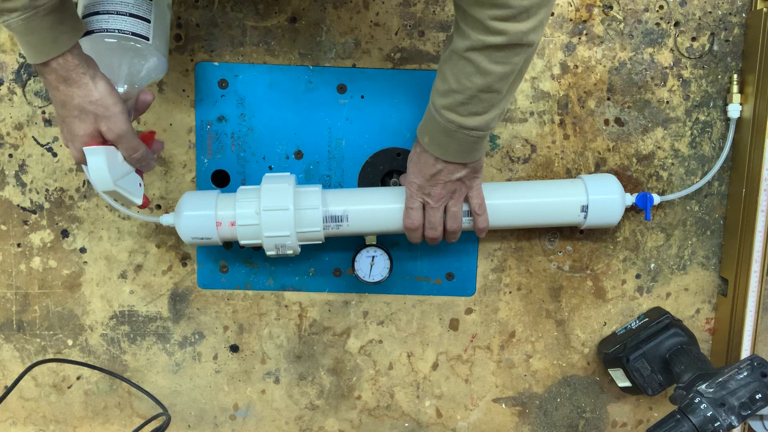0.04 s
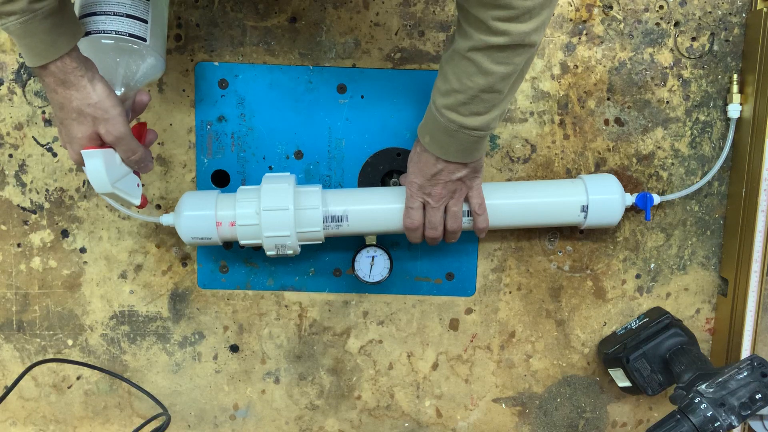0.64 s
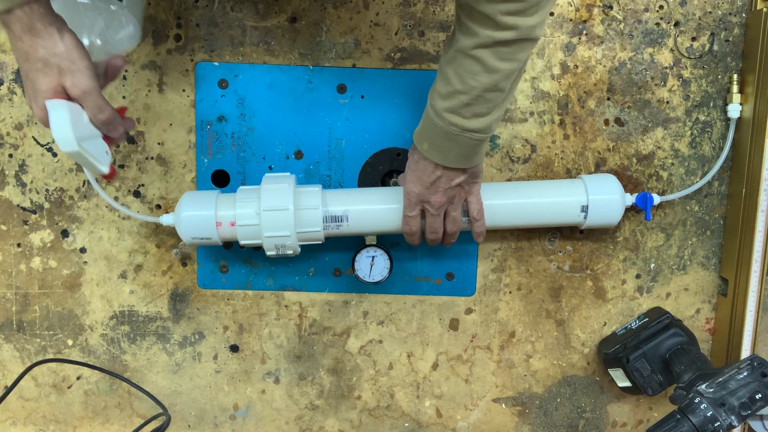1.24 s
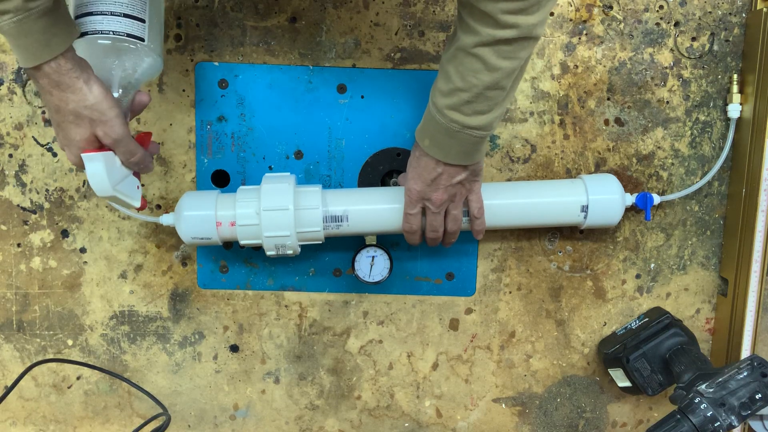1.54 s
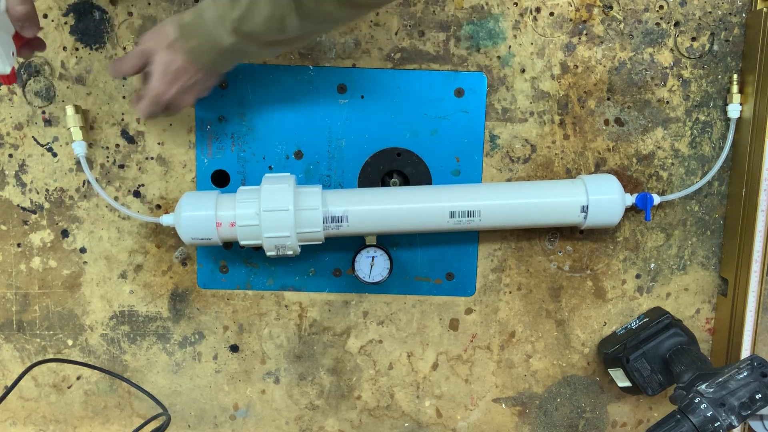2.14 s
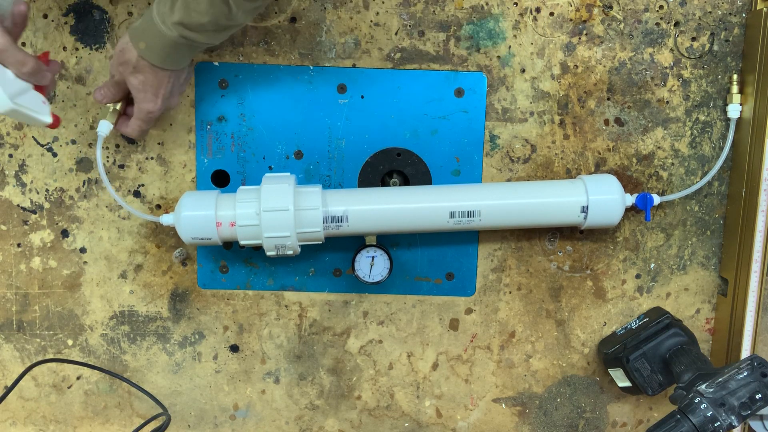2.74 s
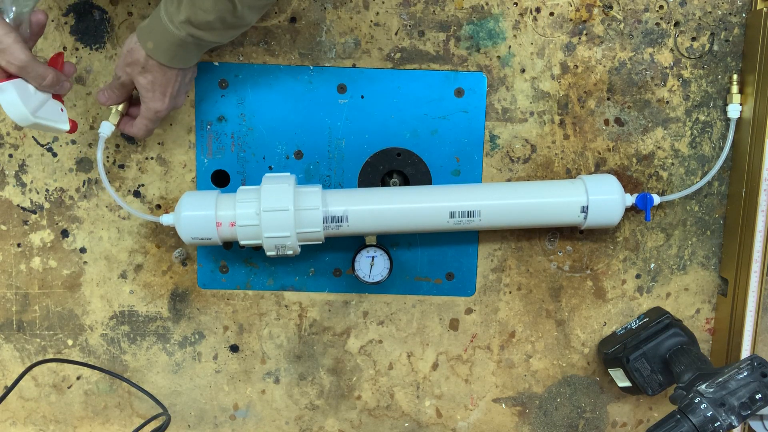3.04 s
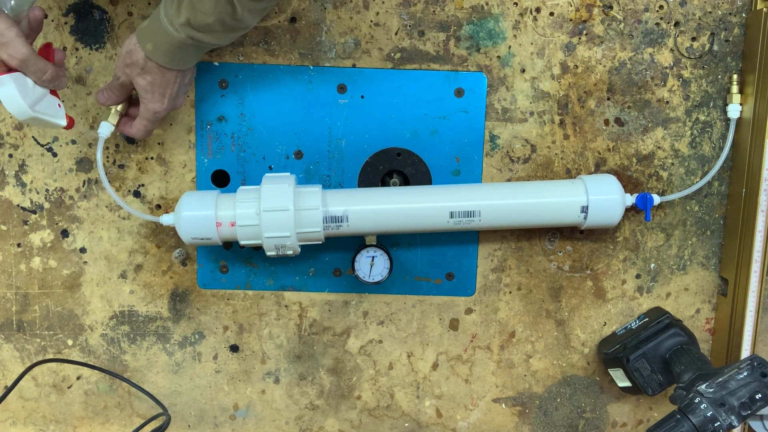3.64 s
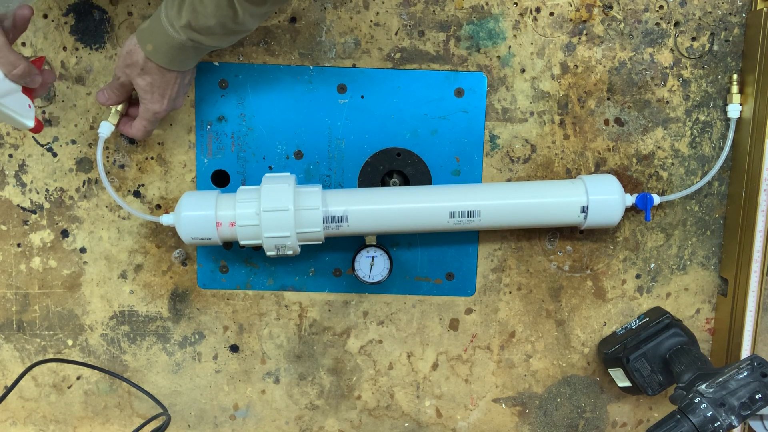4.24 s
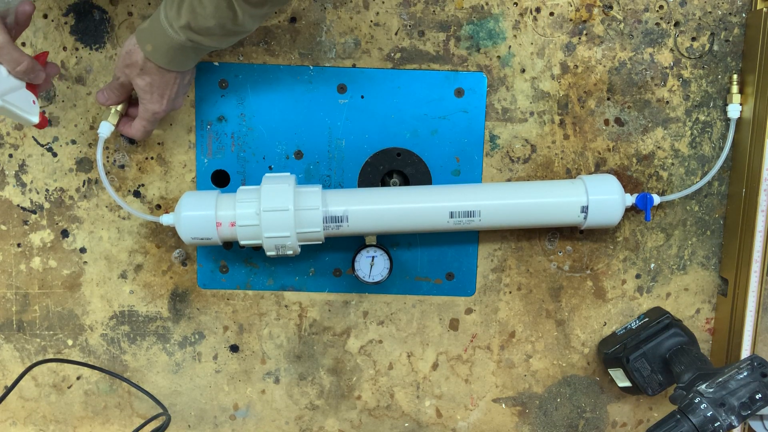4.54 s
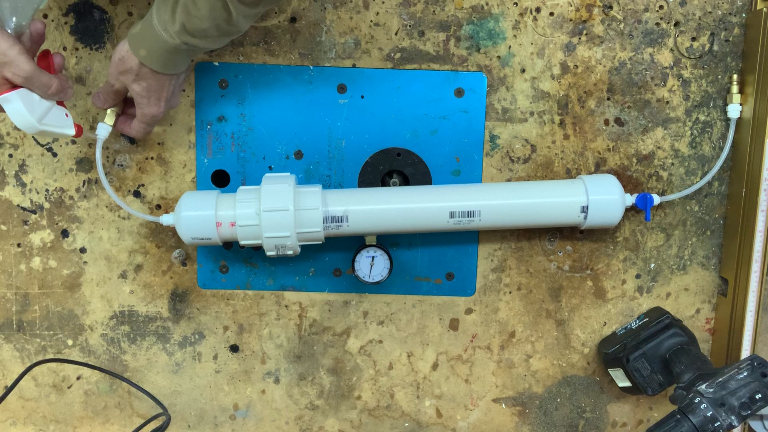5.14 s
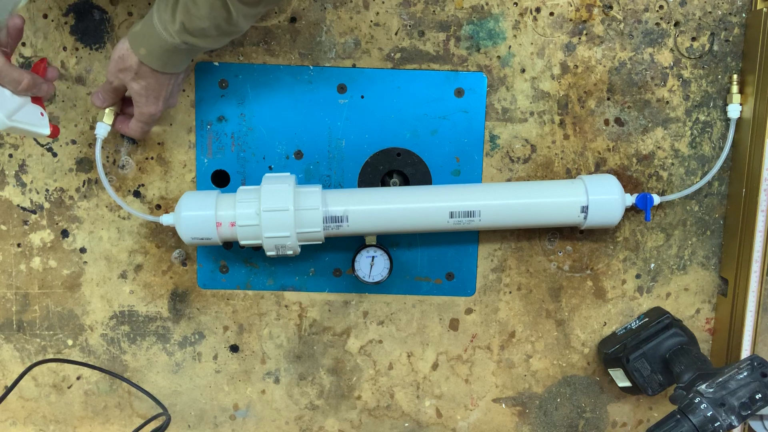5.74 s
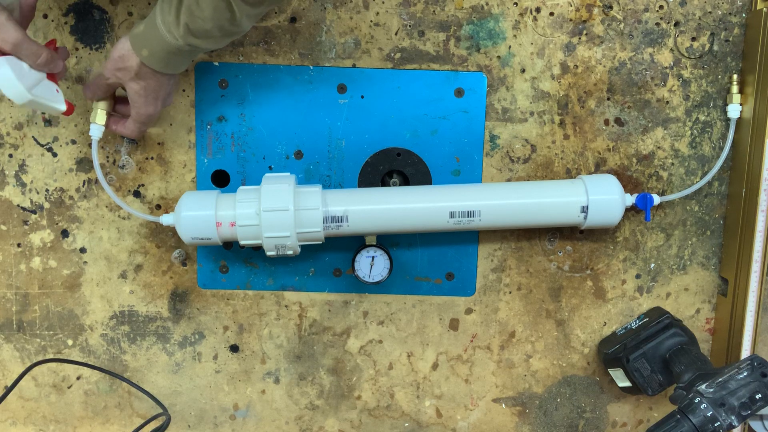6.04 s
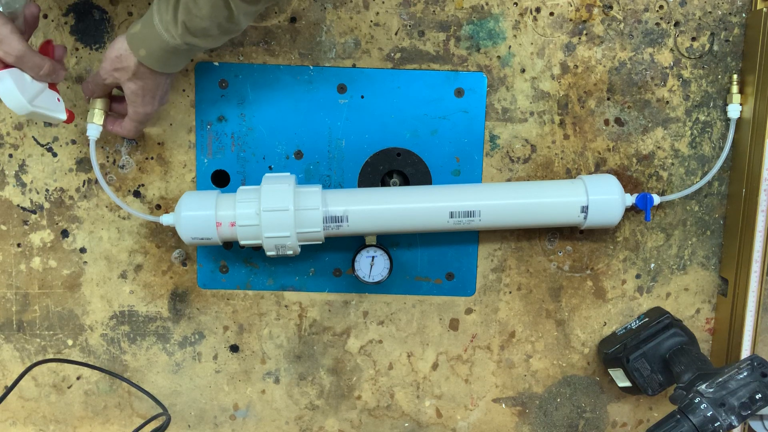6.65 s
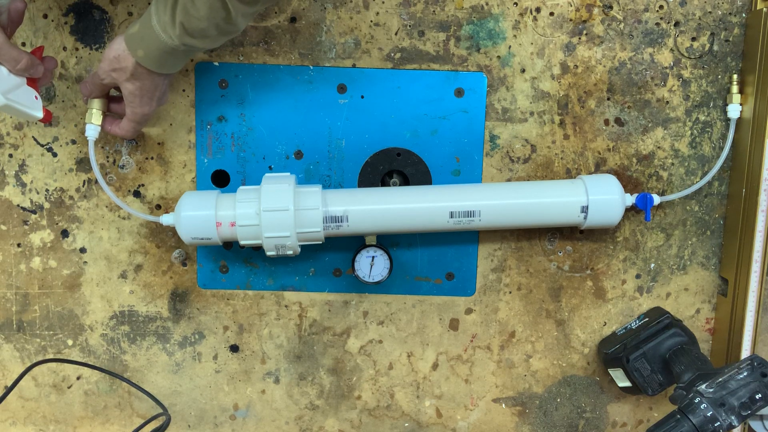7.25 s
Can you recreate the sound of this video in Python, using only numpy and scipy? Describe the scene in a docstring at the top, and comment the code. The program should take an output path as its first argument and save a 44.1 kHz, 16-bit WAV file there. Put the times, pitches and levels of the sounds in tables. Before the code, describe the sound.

A plastic trigger spray bottle squirts soapy water onto a brass fitting, close and slightly to the left. Each pull makes a quick, creaky spring snap, a short hiss and a small tick as the trigger returns. Three quick squirts come in the first 0.8 seconds, followed by release ticks and faint suction, then a weaker squirt near 1.7 seconds. From 2 to 2.7 seconds a sleeve rustles, fingers scuff a hose and hands softly bump the workbench. Four more squirts run from about 3.2 to 4 seconds, followed by ticks and a brief rub. Two softer, creakier pulls come at 5 and 5.4 seconds, and a fingertip faintly wipes the wet fitting near 5.8. Three light squirts follow between 6.3 and 6.9 seconds, ending in trigger ticks. A low ventilation drone continues throughout in the small, slightly echoing workshop.

```python
"""Quick clicks and short hisses: a spray bottle squirts soapy water on a brass fitting, off to the left.
At each pull the coils of the trigger spring snap free, the nozzle hisses and the valve shuts with a gulp.
The trigger ticks back, and when it is let out all the way the pump sucks up more water.
A sleeve rustles and hands bump the workbench, over the low drone of a small workshop's ventilation."""
import sys
import numpy as np
from scipy import signal
from scipy.fft import rfft, irfft, next_fast_len
from scipy.io import wavfile
from scipy.ndimage import map_coordinates

SR = 44100
rng = np.random.default_rng(int(sys.argv[2]) if len(sys.argv) > 2 else 0)


def store_wav(level_fs):
    """Save 16-bit WAV to argv[1]."""
    pcm = np.round(np.clip(np.atleast_2d(level_fs), -1, 1) * 32767)
    wavfile.write(sys.argv[1], SR, pcm.T.astype(np.int16))


N = 321224

# Levels in all tables are relative: each layer adds its own gain.
# pulls of the trigger: t/s, coils that slip, first gap/s, crack/dB, bottle shake/dB
PULLS = [(0.1272, 2, 0.0092, -19, -35.5), (0.391, 2, 0.0086, -20.5, -34.5), (0.646, 2, 0.0091, -22, -33),
         (1.666, 2, .0072, -21, -34.5), (3.184, 3, 0.0096, -24, -36.5), (3.4404, 2, 0.0091, -24, -35.5),
         (3.6847, 2, .009, -22, -37.5), (3.9113, 2, 0.0091, -20, -35.5), (5.011, 5, .016, -24.5, -34.5),
         (5.4097, 4, 0.015, -26.5, -36), (6.3297, 2, 0.009, -28.5, -40), (6.595, 2, .011, -23, -32),
         (6.8222, 3, 0.0079, -29, -39)]
# squirts: start/s, valve shuts/s, mist/dB, gulp/dB, tick/dB
SQUIRTS = [(0.0, 0, -51, -46, -38), (0.156, 0.266, -43, -41.5, -38.5), (0.413, 0.506, -40.5, -47.5, -33.5),
           (0.672, 0.736, -45, -45.5, -37.5), (1.457, 1.563, -60, -47.5, -40.5),
           (1.683, 1.744, -55.5, -45, -38.5), (2.932, 3.051, -56, -52.5, -39),
           (3.211, 3.305, -53, -50.5, -39.5), (3.403, 3.546, -44, -63, -39.5),
           (3.71, 3.791, -47, -51.5, -41.5), (3.935, 4.004, -45, -53, -41.5),
           (5.057, 5.231, -56, -58.5, -39), (5.452, 5.554, -54.5, -57.5, -40),
           (6.344, 6.462, -56, -53, -39.5), (6.61, 6.707, -55.5, -50.5, -41.5),
           (6.85, 6.905, -56, -47, -41), (7.251, 7.284, -61.5, -57, -52.5)]
# the trigger let out all the way: first tick/s, last tick/s, ticks, tick/dB, ring/dB, ping/dB, suction/dB
RELEASES = [(0.8766, 0.9727, 4, -36, -38.5, -40, -59), (1.8797, 1.934, 3, -32, -39.5, -31.5, -58.5),
            (4.1456, 4.211, 3, -32.5, -42, -49, -55.5), (5.335, 5.374, 2, -43.5, -51, -57, -61.5),
            (5.711, 5.7588, 2, -32.5, -47.5, -53, -67.5), (7.039, 7.0765, 2, -34, -43, -45, -70.5)]
# tone of a sharp click: f/Hz, level/dB
CLICK_TONE = [(200, 0), (1000, -7), (2400, -6), (3500, 2), (5500, 1.5), (7500, 1), (9000, 3.5),
              (11000, 2.5), (13500, -4.5), (16000, -34)]


def amp(db):
    """Turn decibels into a gain."""
    return 10 ** (np.asarray(db) / 20)


def unit(x):
    """Scale x to an average (rms) level of 1."""
    return x / np.sqrt(np.mean(x ** 2) + 1e-20)


def along(points, hz):
    """Read a table of (f/Hz, value) between its points, on a log frequency axis."""
    f, values = np.transpose(points)
    return np.interp(np.log(hz + 1), np.log(f + 1), values)


def filtered(x, response):
    """Change the strength and phase of each frequency in x by response(hz)."""
    n = x.shape[-1]
    padded = next_fast_len(n + 8192)
    return irfft(rfft(x, padded) * response(np.fft.rfftfreq(padded, 1 / SR)), padded)[..., :n]


def coloured(x, tone, size=2048):
    """Give x a tone (f/Hz, level/dB) with a filter that keeps white noise at the same power."""
    cepstrum = irfft(np.log(amp(along(tone, np.fft.rfftfreq(size, 1 / SR)))))
    cepstrum[1:size // 2] *= 2  # folded forward, so nothing rings before its cause
    cepstrum[size // 2 + 1:] = 0
    kernel = irfft(np.exp(rfft(cepstrum)))
    return signal.fftconvolve(x, kernel / np.linalg.norm(kernel))[:len(x)]


def ringing(modes, hz):
    """How an object with these resonances (f/Hz, width/Hz, level/dB) answers each frequency."""
    return sum((-1) ** k * amp(db) * 1j * hz * width / (centre ** 2 - hz ** 2 + 1j * hz * width)
               for k, (centre, width, db) in enumerate(modes))


def wobble(rate):
    """A smooth curve through rate random values a second."""
    return map_coordinates(rng.standard_normal(int(N * rate / SR) + 4), [np.arange(N) * rate / SR])


def swell(start, rise, hold, fall):
    """A loudness curve: it rises, stays full until hold seconds after the start, then dies away."""
    gain = np.zeros(N)
    first = min(max(round(start * SR), 0), N)
    age = np.arange(min(2 * SR, N - first)) / SR
    gain[first:first + len(age)] = np.minimum(age / rise, 1) * np.exp(-np.maximum(age - hold, 0) / fall)
    return gain


def bursts(times, levels_db, t60):
    """A burst of noise at each time, even across all pitches, fading about 60 dB in t60 seconds."""
    out, t = np.zeros(N + SR), np.arange(round(t60 * SR)) / SR
    fade = amp(-60 * t / t60)
    for at, db in zip(times, levels_db):
        spectrum = rfft(fade * rng.standard_normal(SR // 2)[:len(t)])
        burst = np.sqrt(fade) * irfft(spectrum / np.abs(spectrum), len(t))
        burst *= np.linalg.norm(fade) / np.linalg.norm(burst)
        out[max(round(at * SR), 0):][:len(t)] += amp(db) * burst
    return out[:N]


def grainy(tone, grain_db, grain_rate):
    """Noise at level 1 that comes in tiny clumps."""
    return unit(coloured(rng.standard_normal(N) * amp(grain_db * wobble(grain_rate)), tone))


def spread(pair, likeness):
    """Mix two unrelated signals into left and right: likeness 0 stays unrelated, 1 is the same."""
    angle = lambda hz: np.arccos(np.clip(along(likeness, hz), -1, 1)) / 2
    mid, side = filtered(pair, lambda hz: np.array([np.cos(angle(hz)), np.sin(angle(hz))]))
    return np.array([mid + side, mid - side])


def background():
    """A low ventilation drone, a little to the left, and a thin wash of air."""
    # tones of the drone and the air: f/Hz, level/dB
    drone_tone = [(20, -67), (30, -19), (42, 2.5), (55, -8), (66, 5.5), (76, 1), (92, -7), (108, -1.5),
                  (127, 2), (158, -14.5), (210, -15), (260, -15.5), (320, -13), (480, -27), (900, -54.5)]
    air_tone = [(150, -33), (300, -11), (420, -2), (560, -7.5), (800, -1.5), (1250, -0.5), (1600, -8.5),
                (2700, -22), (5000, -28.5), (8000, -31), (12000, -31), (16000, -42)]
    # how alike left and right are: f/Hz, likeness
    likeness = [(60, 0.96), (250, 0.55), (700, 0.103), (2000, 0.033), (12000, .1)]

    def wash(tone):
        noise = spread(rng.standard_normal((2, N)), likeness)
        return unit(filtered(noise, lambda hz: amp(along(tone, hz))))
    return amp([[-54], [-55.3]]) * wash(drone_tone) + amp(-64.5) * wash(air_tone)


def echoes(early_db, early_t60, late_db):
    """The room's answer to one click: the bench scatters it at once, the walls ring for longer."""
    # how long the walls echo: f/Hz, time to fade 60 dB/s
    fade_times = [(150, 0.5), (1000, 0.23), (4000, 0.28), (9000, 0.29), (16000, 0.078)]
    # tone of that echo: f/Hz, level/dB
    wall_tone = [(150, -3.5), (1000, -1.5), (4000, 2.5), (9000, 1), (16000, -2)]
    # how alike the left and right echoes are: f/Hz, likeness
    likeness = [(100, 0.78), (300, 0.53), (700, 0), (1500, 0.41), (12000, 0)]
    hz, t, noise = signal.stft(rng.standard_normal((2, SR // 2)), SR, nperseg=256)
    fade = amp(-60 * t / along(fade_times, hz)[:, None])
    late = signal.istft(noise * fade * amp(along(wall_tone, hz))[:, None], SR, nperseg=256)[1]
    age = np.arange(late.shape[1]) / SR
    early = rng.standard_normal(late.shape) * amp(-60 * age / early_t60)
    walls = amp(late_db) * late / np.linalg.norm(late[0])
    bench = amp(early_db) * early / np.linalg.norm(early[0])
    return np.pad(spread(walls + bench, likeness), ((0, 0), (round(0.002 * SR), 0)))


def workshop(x, block=16384):
    """The echoes change as the hands move: each block of sound gets a new random pattern."""
    out = np.zeros((2, N + 2 * SR))
    for start in range(0, N, block):
        pattern = echoes(early_db=-6, early_t60=0.026, late_db=-8)
        echoed = signal.fftconvolve(x[None, start:start + block], pattern, axes=1)
        out[:, start:start + echoed.shape[1]] += echoed
    return out[:, :N]


def from_the_left(x):
    """Sound reaches the left microphone first; the case around the pair shades each side a little."""
    # how far the left side is ahead: f/Hz, phase/rad
    lead = [(20, -0.5), (600, .5), (1900, 2), (3400, 4), (4700, 4), (5800, 4.5), (7500, 4), (9200, 4.5),
            (12600, 6.5), (15600, 9.5)]
    # how much louder the left side is: f/Hz, level/dB
    shade = [(200, -0.5), (700, 4.5), (1400, -2), (2500, -3), (4500, -2.5), (8500, 4.5), (14000, -1.5)]
    half = lambda hz: amp(along(shade, hz) / 2) * np.exp(0.5j * along(lead, hz))
    return filtered(x, lambda hz: np.array([half(hz), 1 / half(hz)]))


def rubbing():
    """Sleeve and fingers rub; the fibres' hiss grows more steeply with speed than the cloth's rustle."""
    # rubs: start/s, rise/s, fall/s, cloth/dB, fibre/dB
    rubs = [(2.005, 0.029, 0.9, -59, -68.5), (2.138, 0.057, 0.035, -50, -59.5),
            (2.43, 0.023, 0.087, -49, -51.5), (2.673, 0.0062, 0.03, -90, -74),
            (4.283, 0.0062, 0.04, -48.5, -48.5), (4.619, 0.0089, 0.081, -65, -72),
            (4.8, 0.013, 0.082, -66, -82), (5.773, 0.022, 0.08, -51.5, -56.5)]
    # tones of the rustle and the hiss: f/Hz, level/dB
    cloth_tone = [(120, -37.5), (200, -7), (232, -8.5), (414, -3.5), (500, -15.5), (628, -7), (954, -11.5),
                  (1610, -8), (5000, -17), (6500, -25.5), (11000, -120)]
    fibre_tone = [(2060, -23), (3500, -11.5), (6400, -4), (7600, -7.5), (8210, 0.5), (11700, -8),
                  (14700, -9), (16000, -28)]
    moves = [(swell(at, rise, rise, fall), cloth_db, fibre_db)
             for at, rise, fall, cloth_db, fibre_db in rubs]
    cloth_gain = sum(amp(db) * speed for speed, db, _ in moves)
    fibre_gain = sum(amp(db) * speed ** 1.9 for speed, _, db in moves)
    cloth = cloth_gain * grainy(cloth_tone, grain_db=2.5, grain_rate=250)
    fibre = fibre_gain * grainy(fibre_tone, grain_db=0.5, grain_rate=350)
    return amp(2) * cloth + amp(6) * fibre


def grips():
    """Fingers grip the fitting and the bottle with a short scuff."""
    # catches: t/s, level/dB
    catches = [(2.426, -43), (4.291, -45.5)]
    # tone of the scuff: f/Hz, level/dB
    scuff_tone = [(300, -31.5), (600, -12), (750, 11.5), (1150, 6), (1700, -5), (5000, -41)]
    return coloured(bursts(*np.transpose(catches), t60=0.099), scuff_tone)


def bench_bumps():
    """Hands and pipe bump the bench, which gives a deep thud and a higher knock."""
    # bumps: t/s, thud/dB, knock/dB
    bumps = [(0.594, -37.5, -42.5), (0.605, -39, -55), (1.441, -48, -53.5), (2.18, -53.5, -47),
             (2.343, -43.5, -49), (2.487, -38.5, -62), (2.518, -41.5, -57.5), (2.61, -45, -67)]
    # tones of the bench: f/Hz, level/dB
    thud_tone = [(30, -27), (70, 8.5), (130, 4.5), (180, 2.5), (260, -21), (400, -36), (2000, -57)]
    knock_tone = [(100, -24), (250, -3), (400, -5), (700, -19.5), (3000, -42)]
    times, thud_db, knock_db = np.transpose(bumps)
    thud = coloured(bursts(times, thud_db, t60=0.11), thud_tone)
    knock = coloured(bursts(times, knock_db, t60=0.1), knock_tone)
    return thud + amp(1) * knock


def fingertip():
    """A fingertip wipes the fitting once: wet skin judders over the brass."""
    # tone of skin on wet brass: f/Hz, level/dB
    brass_tone = [(200, -5.5), (400, -2), (700, -23), (1800, -19), (2700, -0.5), (3400, -22), (8000, -29)]
    wipe = swell(start=5.785, rise=0.0067, hold=0.038, fall=0.051)
    return amp(-47.5) * wipe * grainy(brass_tone, grain_db=-2, grain_rate=440)


def pump():
    """The valve shuts with a gulp; each full release sucks water up the tube, which rings faintly."""
    # tones of the valve, the sucking and the water standing in the tube: f/Hz, level/dB
    valve_tone = [(150, -30.5), (350, -2.5), (600, -4.5), (950, -3.5), (1400, -11.5), (2500, -23.5),
                  (8000, -50)]
    suction_tone = [(300, -12), (1200, -8), (1700, 0), (2200, -6), (3400, -6), (5000, -12), (10000, -14),
                    (16000, -22)]
    tube_tone = [(600, -45), (1450, -20), (1620, -3), (1690, 0), (1770, -3), (1980, -20), (5000, -50)]
    lead_s = 0.083  # water starts to move this long before the first tick
    _, shut, _, gulp_db, _ = np.transpose(SQUIRTS)
    gulps = coloured(bursts(shut, gulp_db, t60=0.019), valve_tone)
    refill = lambda fall: sum(amp(db) * swell(at - lead_s, rise=0.06, hold=0.19, fall=fall)
                              for at, *_, db in RELEASES)
    suction = refill(fall=0.022) * grainy(suction_tone, grain_db=3, grain_rate=440)
    ring = refill(fall=0.13) * unit(coloured(rng.standard_normal(N), tube_tone))
    return amp(6.5) * gulps + amp(-4) * suction + amp(-13) * ring


def trigger():
    """The plastic lever ticks after each squirt; a full release gives a ping and a fading run of ticks."""
    # loose ticks as the finger shifts: t/s, level/dB
    loose_ticks = [(0.1134, -38), (0.37, -45), (1.5847, -41), (3.887, -44), (5.252, -48), (6.8014, -39.5)]
    # tone of the short ring after a tick: f/Hz, level/dB
    ring_tone = [(300, -20), (1200, -7), (1900, 1), (2500, -3), (3300, -1), (4200, -2), (6000, -7),
                 (16000, -24)]
    # resonances of the lever when it hits its stop: f/Hz, width/Hz, level/dB
    lever_modes = [(1790, 160, -1), (2080, 130, -9), (3470, 150, 3.5), (3850, 62, 1)]
    rest_s, tick_loss_db, ring_loss_db = 0.056, 5, 4  # wait after the valve shuts; losses per tick in a run
    returns = [(shut + rest_s, db) for _, shut, _, _, db in SQUIRTS]
    singles = [(at, db, db - 9) for at, db in returns + loose_ticks]
    runs = [(at, db - k * tick_loss_db, ring_db - k * ring_loss_db)
            for first, last, count, db, ring_db, _, _ in RELEASES
            for k, at in enumerate(np.linspace(first, last, round(count)))]
    times, tick_db, ring_db = np.transpose(singles + runs)
    tick = coloured(bursts(times, tick_db + 0.5, t60=0.005), CLICK_TONE)
    ring = coloured(bursts(times, ring_db + 6, t60=0.0062), ring_tone)
    stops, *_, ping_db, _ = np.transpose(RELEASES)
    ping = filtered(bursts(stops, ping_db + 19.5, t60=0.0023), lambda hz: ringing(lever_modes, hz))
    return tick + ring + ping


def slip_db(gap):
    """A coil slips more softly after a longer gap: 7.5 dB less for each doubling."""
    usual_gap_s = 0.0088
    return -7.5 * np.log2(gap / usual_gap_s)


def coils():
    """Coils slip ever faster, and the faster the harder. Gives t/s, crack/dB, bottle shake/dB."""
    slips = []
    for at, count, first_gap, crack_db, shake_db in PULLS:
        k = np.arange(round(count))
        gaps = first_gap * 0.78 ** k
        last = k == k[-1]  # the last coil cracks less and shakes the bottle more
        slips.append([at + np.cumsum(gaps) - gaps,
                      crack_db + slip_db(gaps) - 7 * last,
                      shake_db + slip_db(gaps) + 0.5 * last])
    return np.hstack(slips)


def bottle(x, lag):
    """The spring carries low notes late (by lag seconds at 1 kHz) into the ringing bottle."""
    # resonances of the pump and bottle: f/Hz, width/Hz, level/dB
    bottle_modes = [(239, 33, -2.5), (292, 28.6, 3.5), (380, 97, -3), (495, 48, -7), (619, 31, -4),
                    (779, 55, -3.5), (944, 90, 2), (991, 110, -1.5), (1325, 130, -14.5)]
    delay = lambda hz: np.exp(-4j * np.pi * lag * np.sqrt(1000 * hz))
    return filtered(x, lambda hz: ringing(bottle_modes, hz) * delay(hz))


def spring():
    """The piston creaks; then each slipping coil cracks, buzzes, rings the housing and shakes the bottle."""
    # tone of the creak and the buzz: f/Hz, level/dB
    spring_tone = [(200, -20.5), (600, 2), (1200, -5), (2000, 0.5), (4000, -9), (6000, 0.5), (7500, -8),
                   (10000, -0.5), (13000, -12), (16000, -7.5)]
    # resonances of the plastic pump housing: f/Hz, width/Hz, level/dB
    housing_modes = [(1796, 130, -0.5), (2070, 130, -6.5), (2248, 190, 1), (2634, 220, 1.5),
                     (3100, 250, -2), (3320, 38, -15.5), (4120, 170, 2), (5480, 89, -0.5)]
    load_s = 0.017  # the piston creaks under load this long before the first coil slips
    load = sum(amp(db + slip_db(gap) - 30.5) * swell(at - load_s, rise=0.0025, hold=load_s, fall=0.0012)
               for at, _, gap, db, _ in PULLS)
    creak = load * grainy(spring_tone, grain_db=6.5, grain_rate=550)
    times, crack_db, shake_db = coils()
    crack = coloured(bursts(times, crack_db + 0.5, t60=0.007), CLICK_TONE)
    force_db = (crack_db + shake_db) / 2
    buzz = coloured(bursts(times + 0.001137, force_db - 5, t60=0.041), spring_tone)
    housing = filtered(bursts(times, force_db + 12.5, t60=0.0062), lambda hz: ringing(housing_modes, hz))
    shake = bottle(bursts(times, shake_db + 23.5, t60=0.0087), lag=0.002746)
    return creak + crack + buzz + housing + shake


def jet():
    """Flow through the nozzle: it grows a little during each squirt and dies soon after the valve shuts."""
    growth_db, run_on_s = 0.5, 0.0068
    t, flow = np.arange(N) / SR, np.zeros(N)
    for start, shut, db, _, _ in SQUIRTS:
        strength = np.interp(t, [start, shut], amp([db - growth_db, db]))
        flow += strength * swell(start, rise=0.015, hold=shut - start + run_on_s, fall=0.027)
    return flow


def air_pockets(flow, per_second=45, over_flow_db=5, scatter_db=4):
    """Tiny air pockets burst at random, as strongly as the jet runs."""
    at = rng.integers(N, size=round(per_second * N / SR))
    levels_db = 20 * np.log10(flow[at] + 1e-9) + over_flow_db + scatter_db * rng.standard_normal(len(at))
    return bursts(at / SR, levels_db, t60=0.0091)


def nozzle():
    """The jet tears into hissing mist, sputters, spits now and then and splashes on the fitting."""
    # air pockets spitting from the nozzle: t/s, level/dB
    spit_events = [(0.1695, -23.5), (0.175, -22.5), (0.208, -25), (0.433, -35), (0.703, -30), (3.047, -39),
                   (3.072, -39.5), (3.4033, -23.5), (6.722, -39.5), (6.908, -27.5)]
    # tones of the mist and the splash: f/Hz, level/dB
    mist_tone = [(1000, -23), (5000, -14), (7200, -8.5), (8300, -3.5), (10500, -0.5), (13000, 1),
                 (15000, 2), (16200, -8)]
    splash_tone = [(100, -13.5), (300, 3.5), (800, 0), (1500, -1.5), (3200, 0.5), (4500, -7), (6200, -4.5),
                   (8000, -24), (14000, -18.5)]
    flow = jet() * amp(2.1 * wobble(70))
    mist = flow * grainy(mist_tone, grain_db=2, grain_rate=1200)
    splash = flow ** 0.53 * grainy(splash_tone, grain_db=4.5, grain_rate=820)  # grows less than the mist
    spits = coloured(bursts(*np.transpose(spit_events), t60=0.025), mist_tone)
    sputter = coloured(air_pockets(flow), mist_tone)
    return amp(0.6) * mist + amp(-29.5) * splash + amp(-6.5) * spits + sputter


def scene():
    """The sprayer and hands on the left, with the workshop's echoes and drone."""
    # change in the moving parts' tone while the bottle is held forward over the bench: f/Hz, level/dB
    forward_tone = [(300, -2.5), (420, -1.5), (600, 3), (850, -2.5), (1200, 1), (1700, 1.5), (3000, 1.5),
                    (4100, 0), (6000, -7.5), (8000, -2), (12000, -2.5)]
    forward_until_s = 2.2
    forward = np.arange(N) < forward_until_s * SR
    parts = spring() + trigger() + pump()
    parts = parts * ~forward + filtered(parts * forward, lambda hz: amp(along(forward_tone, hz)))
    near = parts + nozzle() + rubbing() + grips() + bench_bumps() + fingertip()
    return amp(-1.34) * from_the_left(near) + workshop(near) + background()


def record(dry):
    """Cut away the very highest treble."""
    top_hz = 15900
    return filtered(dry, lambda hz: hz < top_hz)


dry = scene()
out = record(dry)
store_wav(out)
```